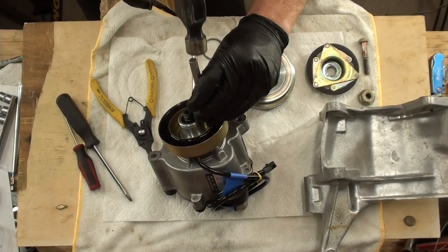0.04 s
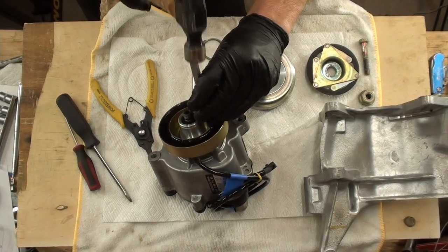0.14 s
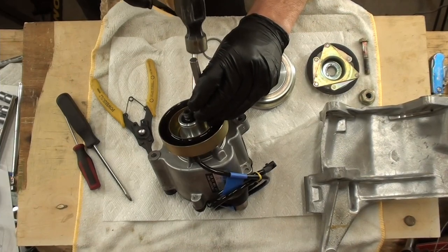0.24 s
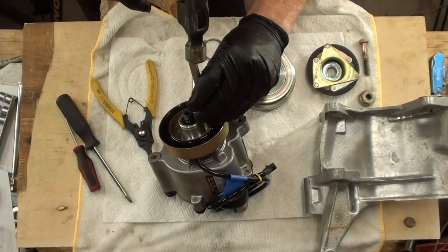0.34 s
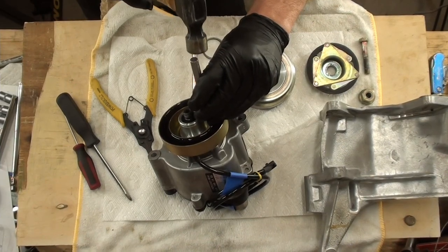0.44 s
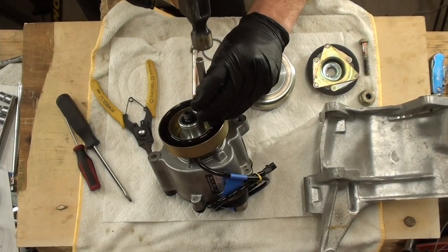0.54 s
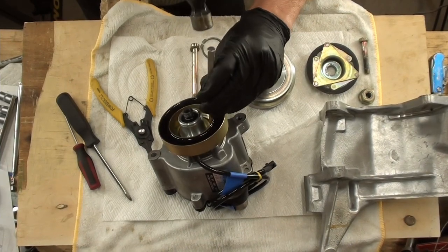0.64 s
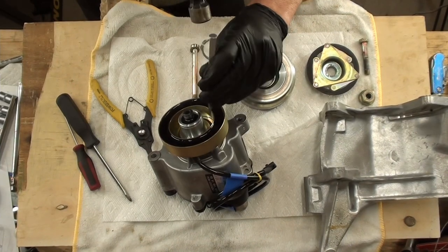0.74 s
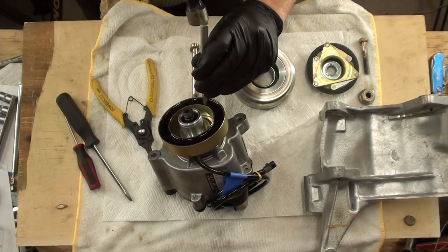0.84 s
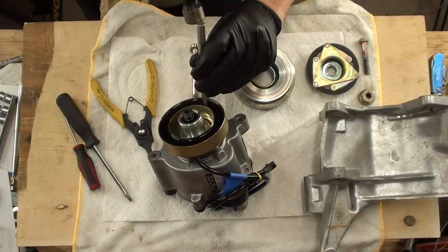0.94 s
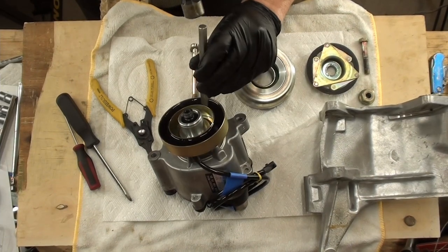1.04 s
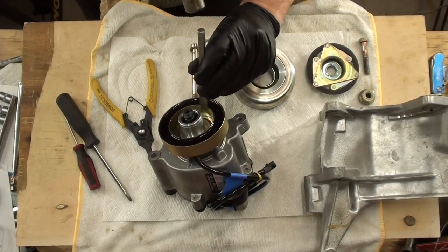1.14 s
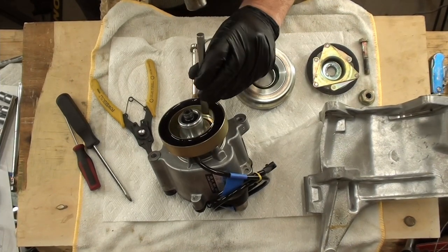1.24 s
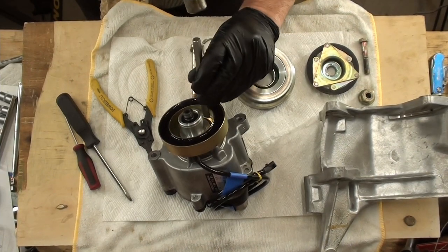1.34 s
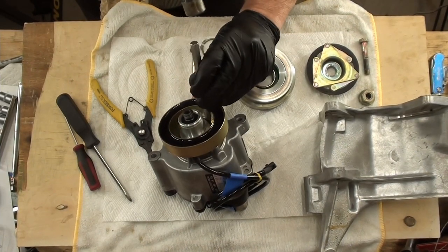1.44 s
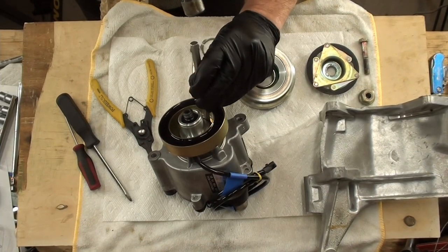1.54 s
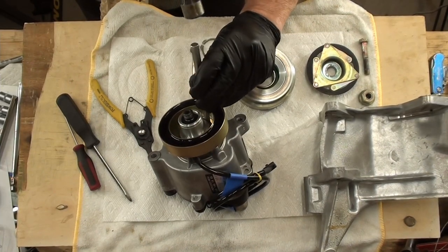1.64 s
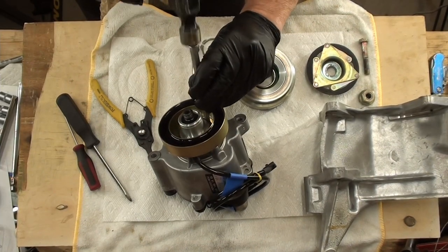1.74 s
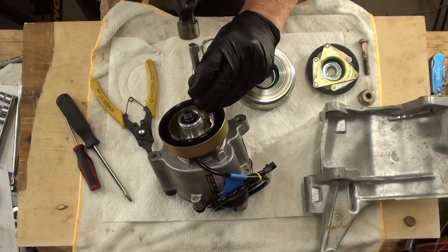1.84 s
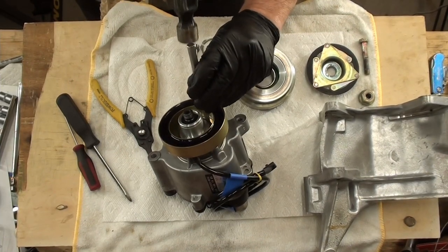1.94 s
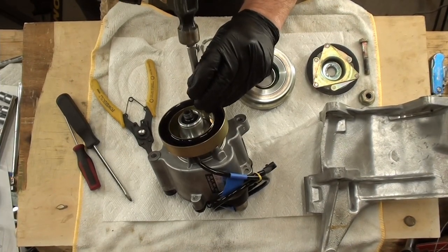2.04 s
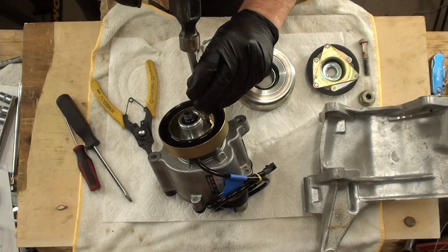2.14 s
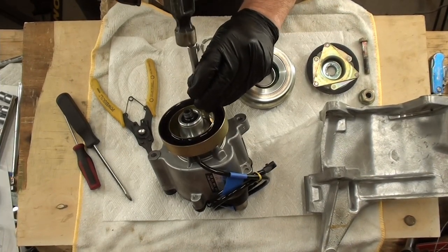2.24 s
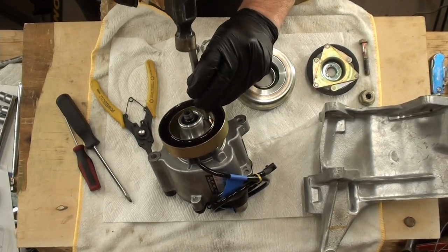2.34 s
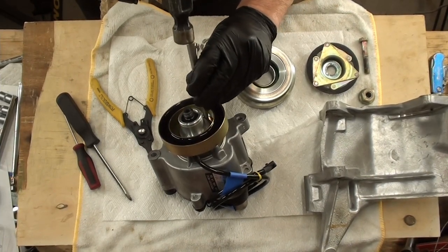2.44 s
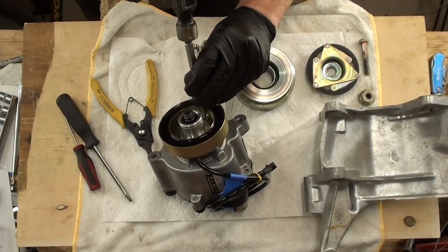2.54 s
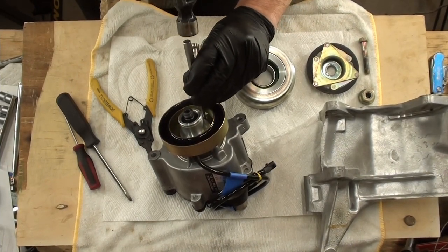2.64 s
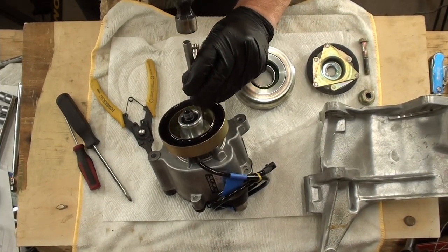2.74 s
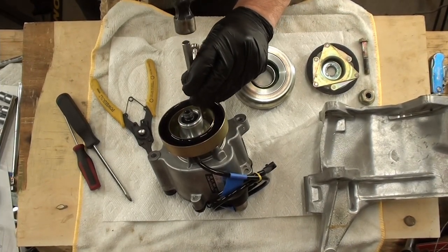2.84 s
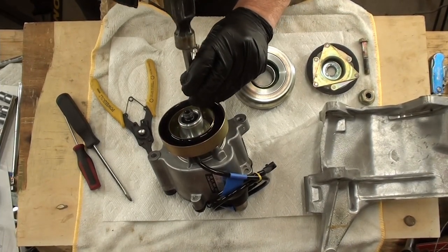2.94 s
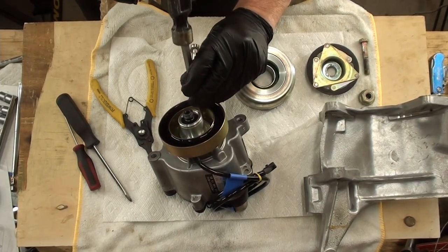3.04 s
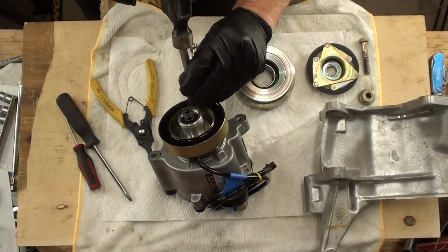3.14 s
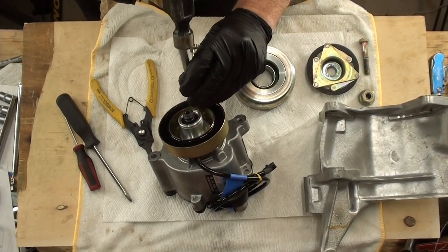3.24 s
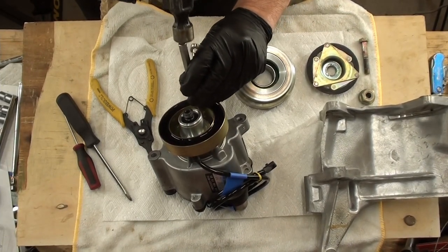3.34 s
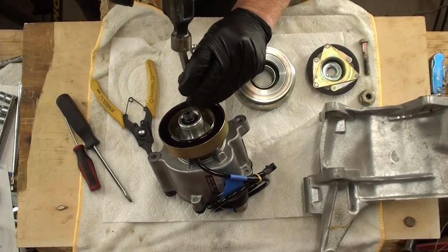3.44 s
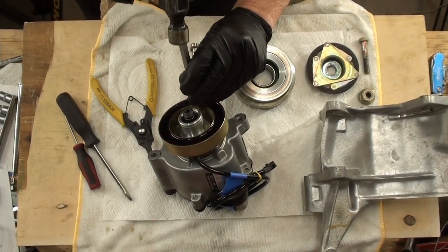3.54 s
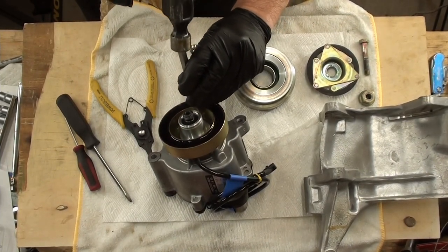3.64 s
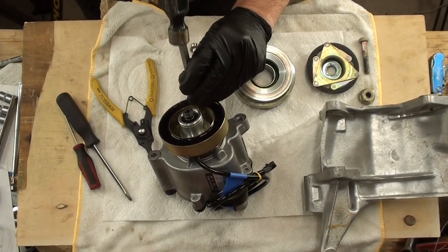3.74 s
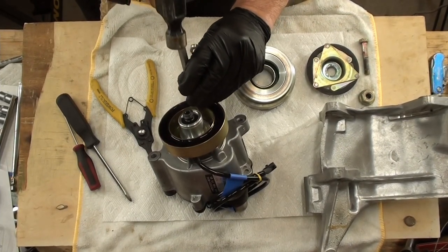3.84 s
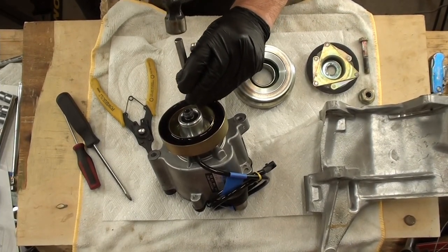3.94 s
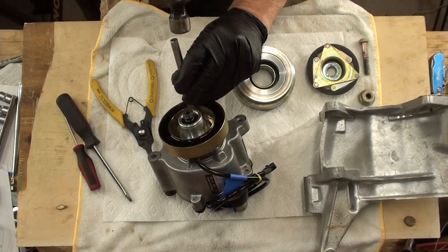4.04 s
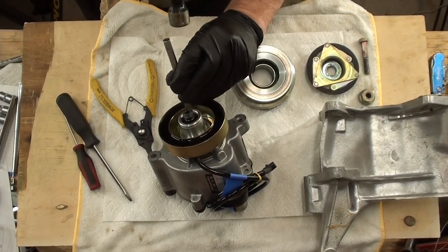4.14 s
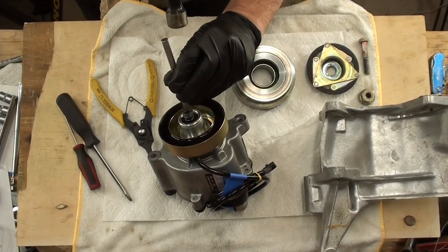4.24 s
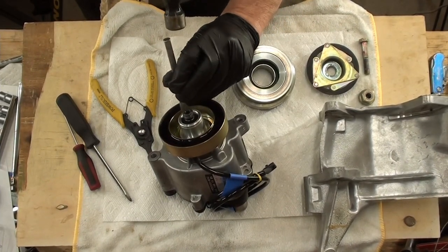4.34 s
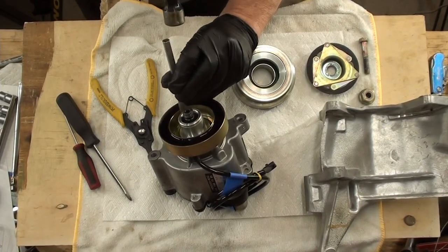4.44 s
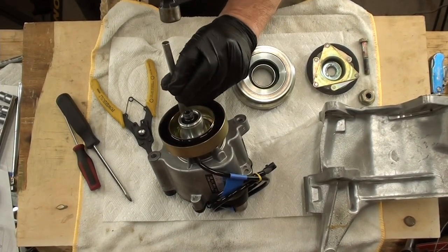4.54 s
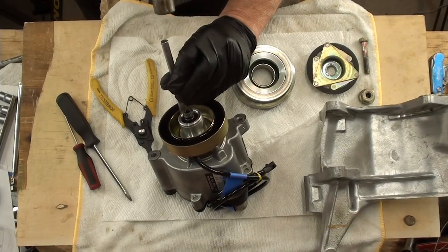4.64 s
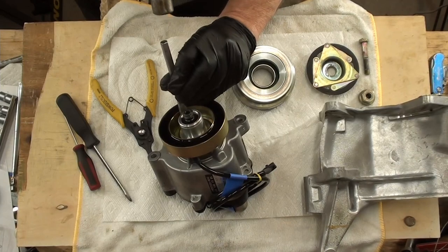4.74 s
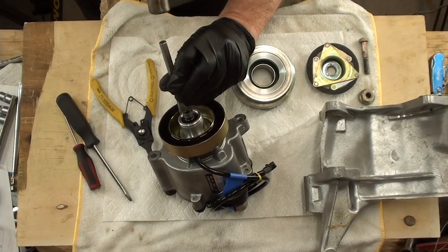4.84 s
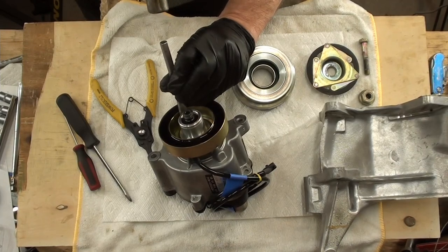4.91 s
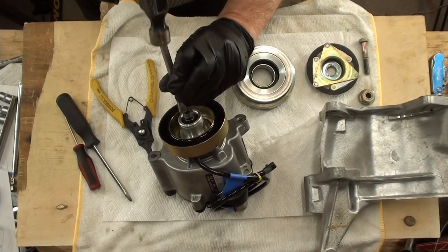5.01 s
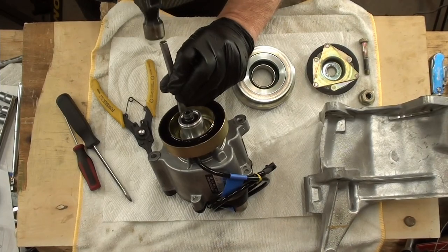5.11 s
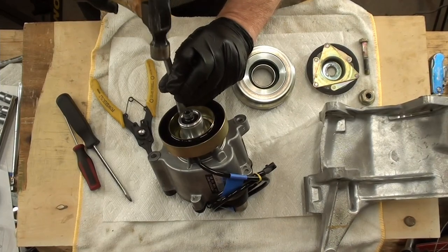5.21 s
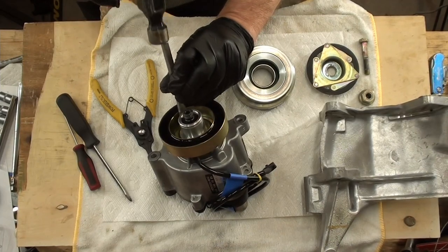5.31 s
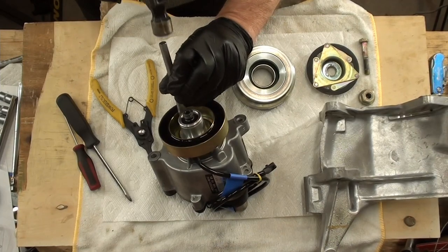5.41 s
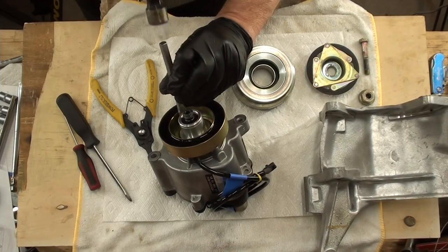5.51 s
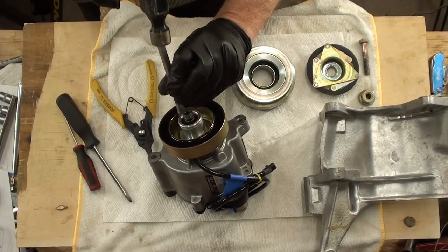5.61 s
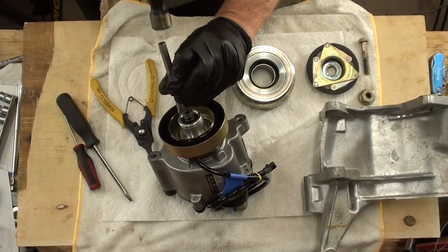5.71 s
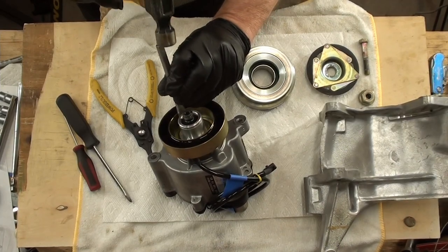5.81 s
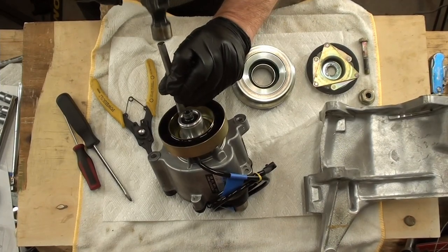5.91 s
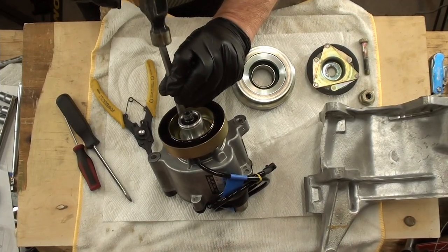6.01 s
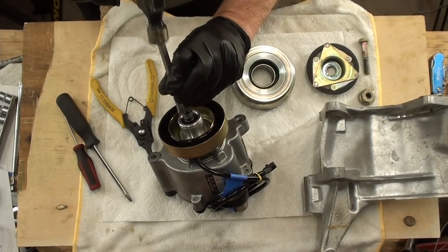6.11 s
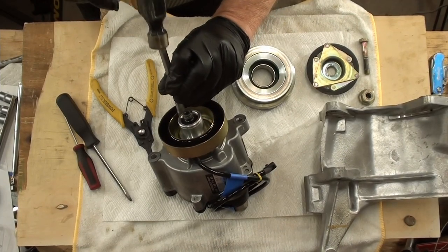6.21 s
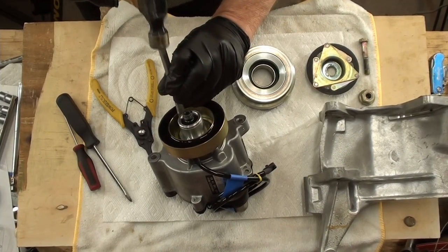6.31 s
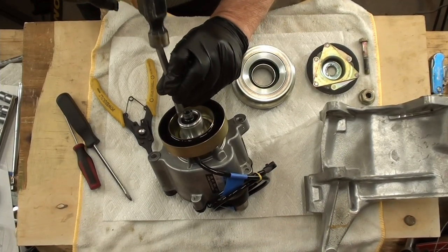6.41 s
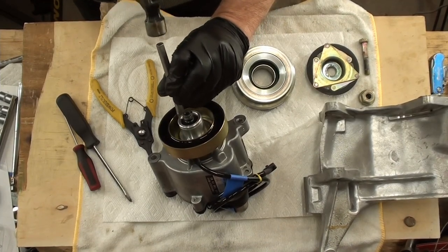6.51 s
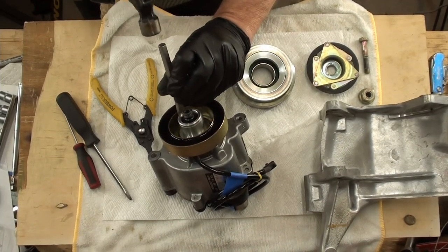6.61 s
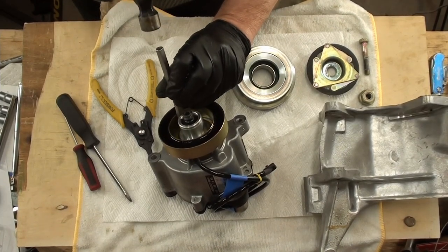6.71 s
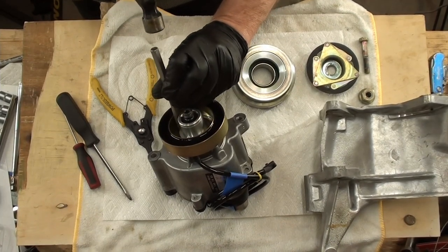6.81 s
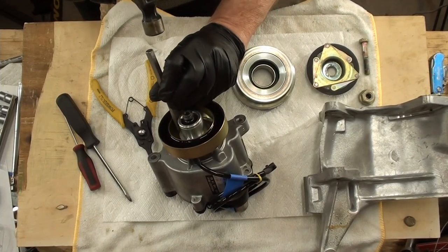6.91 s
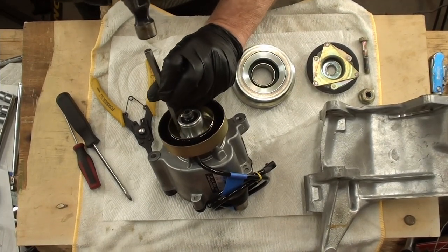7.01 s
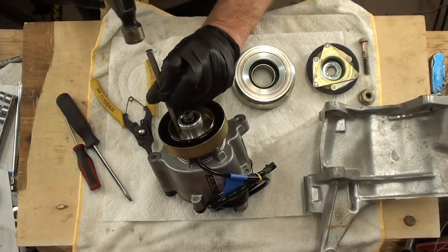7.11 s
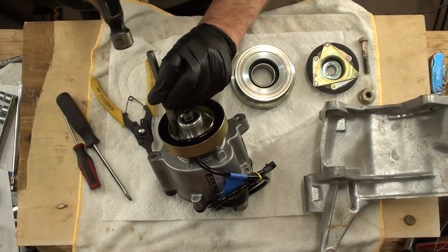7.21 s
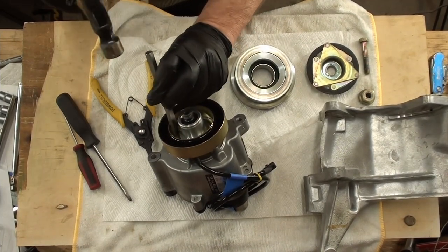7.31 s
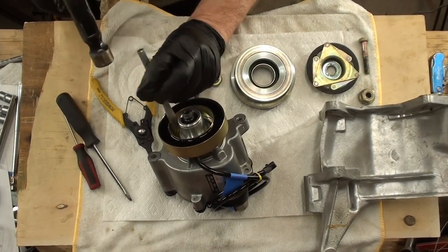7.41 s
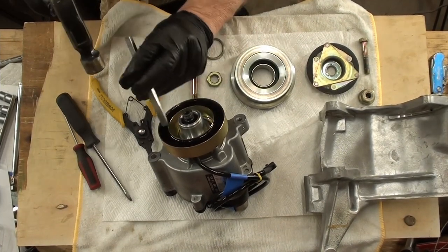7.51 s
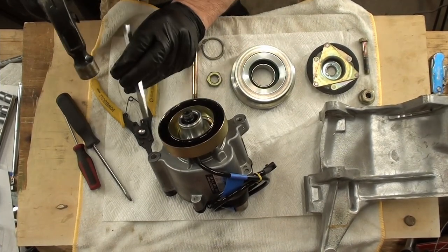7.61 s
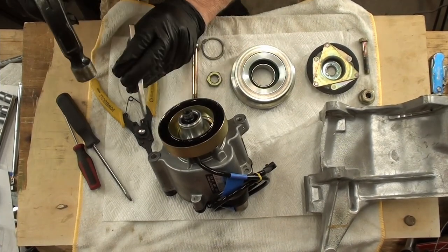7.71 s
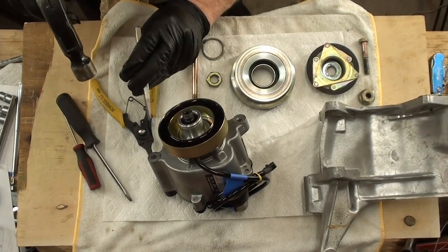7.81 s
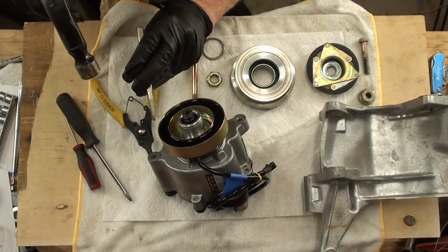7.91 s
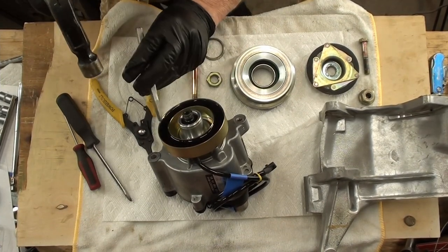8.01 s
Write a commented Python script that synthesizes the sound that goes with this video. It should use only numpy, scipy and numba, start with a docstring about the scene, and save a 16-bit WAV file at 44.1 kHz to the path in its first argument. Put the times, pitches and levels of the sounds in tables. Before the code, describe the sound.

Close in a small workshop, a steel hammer strikes a chisel on a metal part in quick runs, about five or six blows a second. Each is a hard, bright crack with a short high ring and a slight bench thud. Between runs the chisel tip ticks, pings and scrapes lightly on the metal. Four bursts come, then small clanks as the chisel lifts away. A low fan hum and soft rush sit underneath.

```python
"""A hammer blow just struck is still ringing over a fan's hum and rush as quick runs of blows begin.
A small steel hammer taps a chisel set against a metal part on a cloth-covered wooden bench: each blow
sums damped modes of head and bench with minimum-phase impacts. Between runs the chisel tip touches the
part (modes and a tick) and scrapes it (rough noise through resonances). A small workshop answers with
near echoes and a diffuse tail, and a look-ahead limiter turns down the loudest peaks."""
import sys
import numpy as np
from scipy import signal
from scipy.fft import rfft, irfft, next_fast_len
from scipy.io import wavfile
from scipy.ndimage import uniform_filter1d, minimum_filter1d, map_coordinates
from numba import njit

SR = 44100
rng = np.random.default_rng(int(sys.argv[2]) if len(sys.argv) > 2 else 0)


def wav_out(sig):
    """Save sig, one row per channel (or a flat mono array), as 16-bit PCM at SR to the path in sys.argv[1]."""
    wavfile.write(sys.argv[1], SR, np.round(np.clip(np.atleast_2d(sig).T, -1, 1) * 32767).astype(np.int16))


N = 355446
HOLD = SR * 2 // 5  # samples kept of each hit

# Hammer blows; where the face lands sets the ring. Each row: start in seconds, strength in dB, then levels
# in dB over the strength of the lowest head modes, middle modes, top modes and snap.
HAMMER_BLOWS = [(-.125, -10.5, -7.5, -19.5, -15, 11.5), (.053, -5.5, -7, -16, -26.5, 7.5),
                (.233, -4.5, -8, -11, -20.5, 10), (0.41, -5.5, -5, -11.5, -25.5, 8),
                (0.951, -38.5, 5.5, -12.5, -34.5, 25.5), (1.842, -4, -8.5, -8.5, -42, 8),
                (2.066, -8, -9.5, -9, -36.5, 9.5), (2.207, -5, -9, -4, -49.5, 4.5),
                (2.389, -10, -21, -25, -32, 11.5), (3.158, -8, -2.5, -20, -20, 6.5),
                (3.332, -8, 4.5, -10.5, -29.5, 7), (3.504, -9, -4.5, -13.5, -19.5, 3),
                (3.665, -15, -9.5, -28, -32, 9.5), (3.843, -8.5, -2, -16, -20, 3.5),
                (5.269, -29.5, -1, 3.5, -2.5, 30), (5.658, -3.5, -6.5, -9.5, -14, 8.5),
                (5.845, -4, -8, -21.5, -21, 7), (6.017, -5.5, -7, -20.5, -16, 9.5),
                (6.214, -6.5, -7, -4, -12.5, 12.5), (6.403, -12, -13.5, -34, -19, 17.5)]
# Modes of the hammer head. Each row: frequency in Hz, relative level in dB, t60 in seconds, group 0-2.
HEAD_MODES = [(6591, 0, .25, 0), (6606, -4, .23, 0), (7143, -11, .2, 0), (7380, -20, .15, 0),
              (7500, -21, .2, 0), (7690, -22, .15, 0), (8288, 0, .2, 1), (9430, -24, .2, 1),
              (9717, -11, .25, 1), (11385, 0, .15, 2), (11950, -18, .12, 2), (14250, -25, .15, 2)]
# Modes of bench top and part lying on it. Each row: frequency in Hz, relative level in dB, t60 in seconds.
BENCH_MODES = [(95.5, -7, .3), (109, -18.5, 0.42), (155.4, -10.5, 0.32), (211, -10.5, 0.35), (285, -2, 0.2),
               (320.4, -5, 0.2), (602, -3, .17), (630, -7, .12), (704, -6, .14), (763, -5, .16),
               (932, -7, .13), (1820, -6, .15), (3090, -3, .09), (3274, -7.5, 0.039), (3446, -7.5, 0.098),
               (4450, -7, 0.12), (4670, 3, .04), (5190, -9.5, 0.037), (5900, -1, 0.11)]
# Steel on steel, coloured by the part. Each row: frequency in Hz, relative density in dB per Hz.
CRACK_SPECTRUM = [(900, -26.5), (1850, -21.5), (2500, -17), (3300, -13.5), (3900, -19.5), (4600, -12.5),
                  (5300, -15), (6000, -4), (7400, 4.5), (8500, -5), (10000, -39), (12000, -29),
                  (13500, -41.5), (16400, -71.5)]
# Impact on bench top and part. Each row: frequency in Hz, relative density in dB per Hz.
KNOCK_SPECTRUM = [(50, -34), (90, -15), (280, 0.5), (480, -15.5), (620, 3.5), (1200, -5), (2000, -4),
                  (2600, -16.5), (5000, -49.5)]
# Snap of a glancing edge. Each row: frequency in Hz, relative density in dB per Hz.
SNAP_SPECTRUM = [(300, -33.5), (1500, -19.5), (4500, -16.5), (7000, -10), (8700, 0.5), (10300, -13),
                 (12000, -12.5), (14000, -33.5), (16400, -30)]
# Light taps hardly reach the bench, hard ones all shake it alike.
# Each row: blow strength in dB, thud level in dB before the gains of its two parts.
THUD_BY_STRENGTH = [(-38, -73), (-15.5, -35), (-3.5, -28), (-1, -28)]

# Diffuse decay of the workshop. Each row: frequency in Hz, t60 in seconds.
SHOP_DECAY = [(80, 0.24), (300, 0.39), (1000, 0.46), (3000, 0.47), (7000, 0.34), (12000, 0.17),
              (16000, 0.26)]
# Bench top and nearest surfaces. Each row: echo delay in seconds, level in dB.
NEAR_ECHOES = [(.0008, -3), (.0024, -10), (.0056, -2), (.0068, -8.5), (.011, -6.5)]
# Stereo spread of the tail. Each row: frequency in Hz, side gain in dB.
ECHO_SPREAD = [(60, -22), (300, -23), (1000, -14.5), (3000, -12.5), (7000, -10.5), (10000, -18.5),
               (14000, -25)]
# Stereo balance of the bench sounds. Each row: frequency in Hz, left minus right in dB.
STEREO_LEAN = [(60, 0), (300, -1.5), (1500, -0.2), (6000, 0.74), (14000, 0.3)]

# Fan rush and microphone hiss. Each row: frequency in Hz, relative density in dB per Hz.
AIR_SPECTRUM = [(20, -23.5), (60, -8.5), (120, -4.5), (300, -9.5), (600, -7.5), (1200, -12.5),
                (2500, -17.5), (4000, -18), (4900, -15.5), (6000, -19), (8600, -14.5), (9800, -20.5),
                (15500, -23), (16400, -27)]
# Stereo likeness of the air. Each row: frequency in Hz, left-right correlation.
AIR_LIKENESS = [(60, 1), (180, 0.44), (550, 0.2), (1650, 0.04), (4970, 0.82), (15000, 1)]
AIR_DB = -58  # mean level of the rush's mid signal
# Partials of the fan hum. Each row: nominal frequency in Hz, mean relative level in dB.
FAN_PARTIALS = [(72.5, -12.5), (145, 3), (217.5, 1), (295, 0.5), (360, -8), (435, -4.5)]
# The hum swells and sinks. Each row: time in seconds, gain in dB.
HUM_SWELL = [(0, -57.5), (1, -68), (2, -63.5), (2.999, -66), (4.4, -73), (5.3, -67.5), (6.8, -66.5),
             (8.06, -65)]

# Chisel tip touching the part. Each row: start in seconds, gain in dB, name of the spot.
TIP_TOUCHES = [(.7, -30.5, "dull"), (.769, -34, "clank"), (1.029, -38.5, "clank"), (1.197, -23, "ping"),
               (1.245, -33, "ping"), (1.357, -32.5, "ping"), (1.502, -15, "flat"), (2.575, -33, "tink"),
               (2.769, -41, "tink"), (4.239, -46, "dull"), (4.3, -46, "faint"), (4.62, -52, "dull"),
               (6.697, -48, "dull"), (6.836, -39, "dull"), (7.123, -37, "dull"), (7.132, -30, "dull"),
               (7.159, -42, "clank"), (7.221, -40, "tink"), (7.2521, -18.5, "clank"),
               (7.2741, -22.5, "clank"), (7.456, -33, "rim"), (7.477, -19, "rim"), (7.558, -32, "clank"),
               (7.801, -44, "clank")]
# Modes of chisel and loose part. Each row: frequency in Hz, relative level in dB, t60 in seconds, group 0-5.
CHISEL_MODES = [(1850, -14, .06, 0), (1905, -11, .09, 0), (2160, -10, .09, 1), (2760, -16, .2, 5),
                (4140, -19, .18, 2), (4570, -10, .04, 2), (6400, -13, .08, 3), (8500, -16, .02, 3),
                (12000, -24, .04, 3), (14300, -30, .03, 3), (7482, -10, .22, 4), (1290, -25, .12, 1)]
# Where the tip lands on the part. Each entry, by spot: levels in dB of the first modes, second mode,
# middle modes, high modes, long mode and third mode (groups 0-5), then thud and tick.
TIP_SPOTS = {"ping": (7, -9, -18, -14, -21, -15, -7, 8.5), "flat": (-8, -14, -7, -8.5, -43, -15, 1, 12.5),
             "dull": (-18.5, -18, -20.5, -27, -30, -20, -8.5, 11),
             "clank": (-4.5, -5.5, -12, -11, -19, -14, -12.5, 11.5),
             "rim": (-4.5, -3, -8, -3, -5.5, -6, -13, 11.5), "faint": (-30, -22, -15, -22, -13, 5, -21, 1),
             "tink": (1, -3, -30, -30, -35, -25, -24, 12)}
TIP_NEAR_DB = -3.5  # the tip works down inside the part, shaded from the near surfaces
CONTACT_T60_S = 0.0076  # the tip skids a little as it lands

# Strokes of the tip dragging while the part shifts on the cloth. Each row: start in seconds,
# hold in seconds, then gains in dB of the dull, bright and scuff layers.
SCRAPE_STROKES = [(0.701, 0.069, -47.5, -52, -55), (1.35, 0.025, -62, -66, -59),
                  (4.122, .03, -83, -74, -60.5), (4.238, 0.011, -73.5, -80, -75),
                  (4.322, .04, -76, -77, -63), (4.49, 0.014, -81, -84, -65.5),
                  (4.624, 0.013, -80, -73, -58.5), (6.836, .085, -70, -64.5, -60),
                  (7.112, 0.024, -60.5, -61.5, -53), (7.217, .03, -61, -61.5, -51.5),
                  (7.501, 0.051, -50, -53, -64), (7.65, .015, -64, -63, -74)]
# Resonances of the part on the cloth. Each row: frequency in Hz, width in Hz, relative level in dB.
CLOTH_RESONANCES = [(780, 120, 0), (950, 160, 0), (1230, 160, -5)]
RISE_DB_PER_S, FALL_DB_PER_S = 507.5, 241  # how a stroke sets in and dies away

TOP_HZ = 16300  # upper band limit


def amp(db):
    """Logarithmic level law: decibels to amplitude gain."""
    return 10 ** (np.asarray(db) / 20)


def unit(x):
    """Power normalization: scales a signal to rms 1."""
    return x / np.sqrt(np.mean(x ** 2) + 1e-20)


def along(points, hz):
    """Logarithmic frequency scale: interpolates (Hz, value) points between their log frequencies."""
    point_hz, values = np.transpose(points)
    return np.interp(np.log(hz + 1), np.log(point_hz + 1), values)


def filtered(x, response):
    """Linear filtering: multiplies the spectrum of x by a response given as a function of Hz."""
    n = x.shape[-1]
    m = next_fast_len(n + 8192)
    return irfft(rfft(x, m) * response(np.fft.rfftfreq(m, 1 / SR)), m)[..., :n]


def wobble(rate):
    """Band-limited fluctuation: a smooth spline through rate random knots a second."""
    knots = rng.standard_normal(int(N * rate / SR) + 4)
    return map_coordinates(knots, [np.arange(N) * rate / SR])


def ring(hz, db, t60, rise):
    """Modal superposition: damped sines with a rise time constant in seconds, each at a random strength."""
    t = np.arange(HOLD)[:, None] / SR
    modes = np.sin(2 * np.pi * hz * t) * amp(-60 * t / t60) * (1 - np.exp(-t / rise))
    return modes @ amp(db + 2 * rng.standard_normal(len(hz)))


def click(spectrum):
    """Minimum phase: the causal, unit-energy pulse of a given colour, found by folding its cepstrum."""
    log_gain = np.log(amp(along(spectrum, np.fft.rfftfreq(4096, 1 / SR))) + 1e-6)
    cepstrum = irfft(log_gain)
    cepstrum[1:2048] *= 2
    cepstrum[2049:] = 0
    pulse = irfft(np.exp(rfft(cepstrum)))
    return np.pad(pulse / np.linalg.norm(pulse), (0, HOLD - len(pulse)))


def shop(x, send, near_db=0):
    """Room acoustics: direct sound, early echoes and a fresh diffuse tail decaying by band, as mid and side."""
    hz, t, bands = signal.stft(rng.standard_normal((2, HOLD)), SR, nperseg=256)
    decay = amp(-60 * t / along(SHOP_DECAY, hz)[:, None])
    tail = signal.istft(bands * decay, SR, nperseg=256)[1]
    tail = np.pad(tail / np.linalg.norm(tail[0]), ((0, 0), (round(.0012 * SR), 0)))
    near = x.copy()
    for delay, db in NEAR_ECHOES:
        near += amp(db + near_db) * np.pad(x, (round(delay * SR), 0))[:len(x)]
    diffuse = signal.fftconvolve(send[None], tail, axes=1)[:, :len(x)]
    return diffuse + near * [[1], [0]]  # direct sound and echoes lie in the middle


def add(track, s, sound):
    """Superposition: mixes a hit, its last quarter faded, into a track that starts HOLD samples early."""
    fade = np.minimum(1, np.linspace(4, 0, HOLD))
    track[:, HOLD + round(s * SR):][:, :HOLD] += sound * fade


def hammer():
    """Impact excitation: each blow cracks, rings the head's modes and thuds into the bench."""
    out = np.zeros((2, N + 2 * HOLD))
    hz, db, t60, group = np.transpose(HEAD_MODES)
    crack = amp(17.0) * click(CRACK_SPECTRUM)
    knock, snap = click(KNOCK_SPECTRUM), click(SNAP_SPECTRUM)
    for s, blow_db, *group_db, snap_db in HAMMER_BLOWS:
        head = ring(hz, db + np.take(group_db, group.astype(int)), t60, rise=0.0035)
        # thud relative to the blow, whose strength multiplies the whole hit below
        thud_db = np.interp(blow_db, *np.transpose(THUD_BY_STRENGTH)) - blow_db
        bench_ring = amp(-2.0) * ring(*np.transpose(BENCH_MODES), rise=0.0052)
        bench = amp(thud_db) * (bench_ring + amp(34.5) * knock)
        edge = amp(snap_db) * snap
        direct = head + bench + crack + edge
        send = amp(1.0) * head + amp(4.0) * bench + amp(6.5) * crack + amp(4.0) * edge
        add(out, s, amp(blow_db) * shop(direct, send))
    return out[:, HOLD:][:, :N]


def air():
    """Broadband noise and a harmonic source: a partly correlated rush with the fan's unsteady hum."""
    def mid_side_response(hz):
        # this split of power between mid and side gives the wanted left-right correlation
        angle = np.arccos(np.clip(along(AIR_LIKENESS, hz), -1, 1)) / 2
        return amp(along(AIR_SPECTRUM, hz)) * [np.cos(angle), np.sin(angle)]

    mid, side = filtered(rng.standard_normal((2, N)), mid_side_response)
    rush = amp(AIR_DB + 1.17 * wobble(2.26)) * np.array([mid + side, mid - side]) / np.std(mid)
    warped_time = np.cumsum(1 + 0.0069 * wobble(2)) / SR  # all partials drift in pitch together
    hum = np.zeros(N)
    for hz, db in FAN_PARTIALS:
        hum += amp(db + 3.7 * wobble(3)) * np.sin(2 * np.pi * hz * warped_time)
    swell = amp(np.interp(np.arange(N) / SR, *np.transpose(HUM_SWELL)))
    return rush + hum * swell


def touches():
    """Modal excitation by position: the tip ticks on the part; where it lands sets which modes speak."""
    out = np.zeros((2, N + 2 * HOLD))
    hz, db, t60, group = np.transpose(CHISEL_MODES)
    for s, touch_db, spot in TIP_TOUCHES:
        *group_db, thud_db, tick_db = TIP_SPOTS[spot]
        modes = ring(hz, db + np.take(group_db, group.astype(int)), t60, rise=0.00021)
        # the tick is coloured by the same spot: (Hz, dB per Hz)
        colour = [(40, -61.5), (200, thud_db + 4.0), (400, thud_db), (1500, thud_db),
                  (2100, group_db[1]), (2800, group_db[5]), (4700, group_db[2]),
                  (8000, group_db[3]), (15000, group_db[3] - 27.5)]
        skid_t = np.arange(HOLD // 20) / SR
        skid = rng.standard_normal(HOLD // 20) * amp(-60 * skid_t / CONTACT_T60_S)
        skid /= np.linalg.norm(skid)
        tick = amp(tick_db) * signal.fftconvolve(click(colour), skid)[:HOLD]
        send = amp(-8.5) * modes + amp(-3.0) * tick
        add(out, s, amp(touch_db) * shop(modes + tick, send, TIP_NEAR_DB))
    return out[:, HOLD:][:, :N]


def resonances(modes):
    """Second-order resonance: sums band responses (Hz, width Hz, dB) with alternating sign."""
    def response(hz):
        total = 0
        for k, (centre, width, db) in enumerate(modes):
            band = 1j * hz * width / (centre * centre - hz * hz + 1j * hz * width)
            total = total + (-1) ** k * amp(db) * band
        return total
    return response


def scrapes():
    """Friction excitation: rough grains drive the chisel's modes, and the part scuffs on the cloth."""
    t = np.arange(N) / SR
    dull = [(hz, 120, db) for hz, db, _, group in CHISEL_MODES if hz < 2500]
    bright = [(hz, 90, db) for hz, db, _, group in CHISEL_MODES if 2500 < hz < 9000]
    bright.append((6050, 1400, -19.5))  # a broad band of hiss
    grains = rng.standard_normal((3, N)) * amp(3.0 * wobble(70))
    bodies = (dull, bright, CLOTH_RESONANCES)
    layers = np.array([unit(filtered(grain, resonances(body))) for grain, body in zip(grains, bodies)])
    gains = np.zeros((3, N))
    for s, hold, *levels_db in SCRAPE_STROKES:
        before, after = np.maximum(s - t, 0), np.maximum(t - s - hold, 0)
        shape = amp(-RISE_DB_PER_S * before - FALL_DB_PER_S * after)
        gains += amp(levels_db)[:, None] * shape
    out = np.sum(gains * layers, axis=0)
    return shop(out, amp(-18.0) * out)


def scene():
    """Mid-side stereo: bench sounds, spread and leaning by band, over the air."""
    mid, side = hammer() + touches() + scrapes()
    side = filtered(side, lambda hz: amp(along(ECHO_SPREAD, hz)))
    pair = np.array([mid + side, mid - side])
    pair = filtered(pair, lambda hz: amp(along(STEREO_LEAN, hz) / 2 * [[1], [-1]]))
    return pair + air()


@njit
def recover(gain, step):
    """Exponential release: the gain drops at once and climbs back towards 1."""
    out, g = np.empty_like(gain), 1.
    for i in range(len(gain)):
        g = min(gain[i], g + (1 - g) * step)
        out[i] = g
    return out


def record(dry):
    """Peak limiting: the microphone drops the deepest bass; a look-ahead limiter, then the band limit."""
    heard = signal.sosfilt(signal.butter(3, 52, "high", fs=SR, output="sos"), dry)
    peak = np.abs(heard).max(axis=0)  # both channels share one gain
    need = np.minimum(1, amp(-4.5) / (peak + 1e-9))
    ahead = minimum_filter1d(need, size=121)
    released = recover(ahead, 1 / (0.046 * SR))  # release time constant 0.046 s
    gain = uniform_filter1d(released, size=121)
    return filtered(heard * gain, lambda hz: hz < TOP_HZ)


dry = scene()
out = record(dry)
wav_out(out)
```